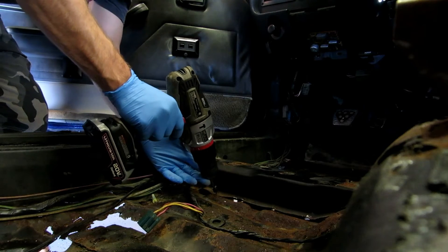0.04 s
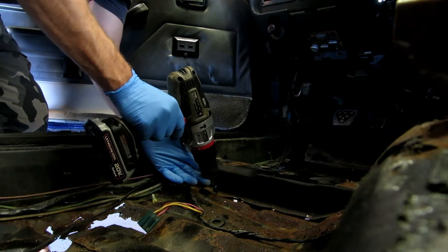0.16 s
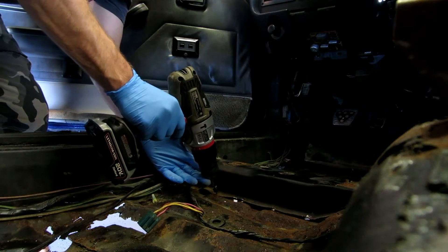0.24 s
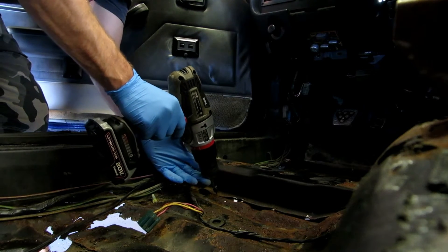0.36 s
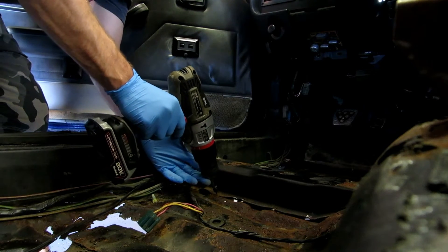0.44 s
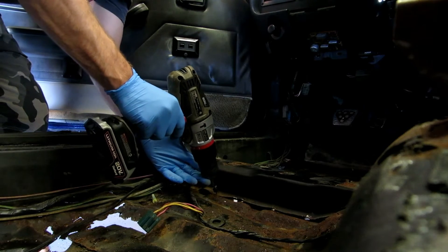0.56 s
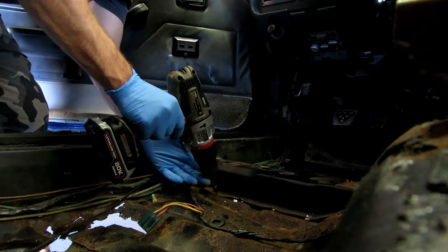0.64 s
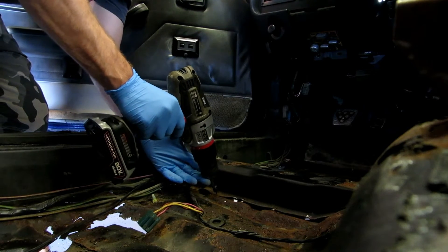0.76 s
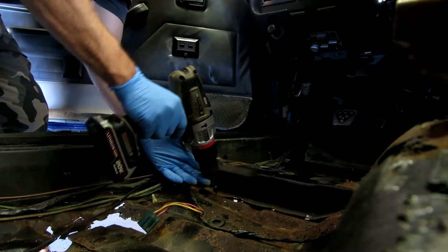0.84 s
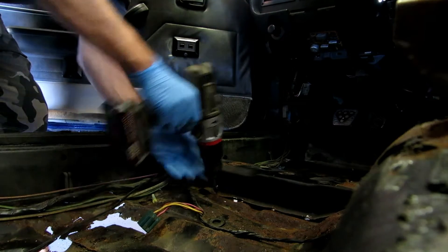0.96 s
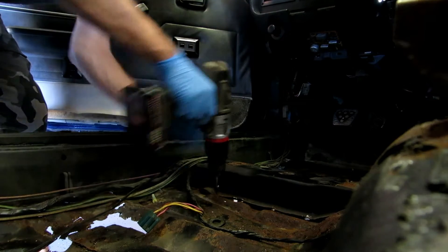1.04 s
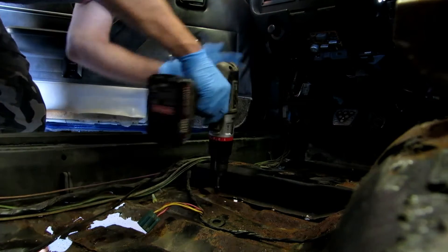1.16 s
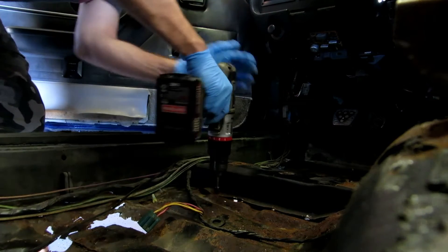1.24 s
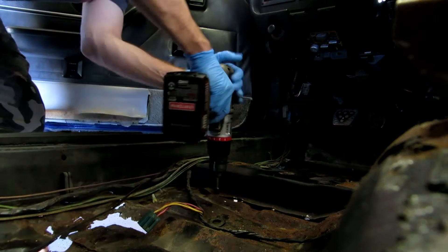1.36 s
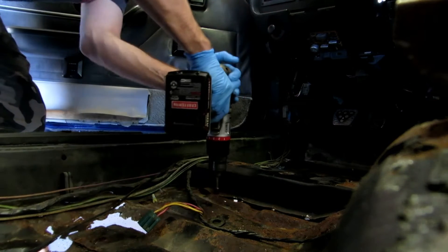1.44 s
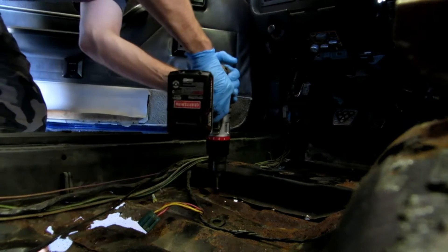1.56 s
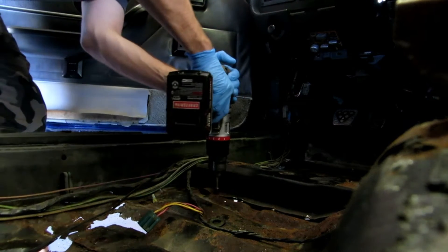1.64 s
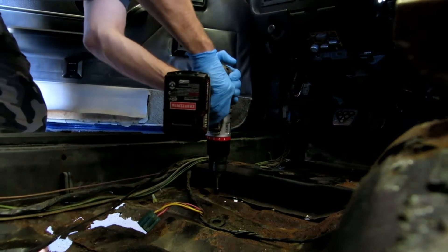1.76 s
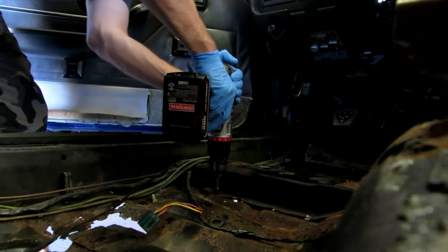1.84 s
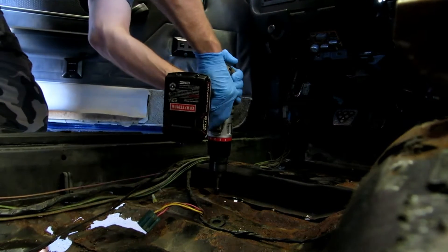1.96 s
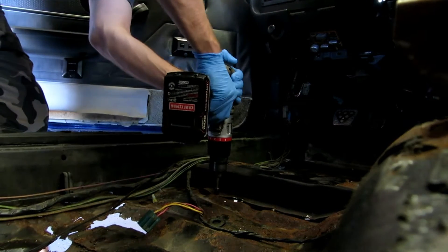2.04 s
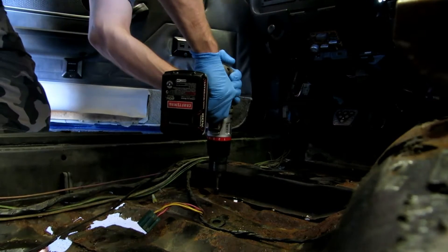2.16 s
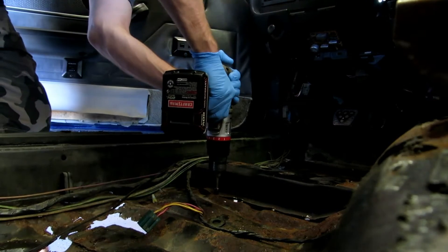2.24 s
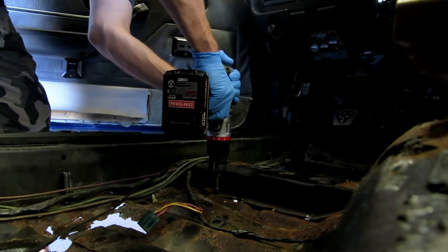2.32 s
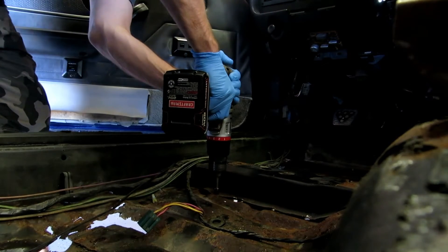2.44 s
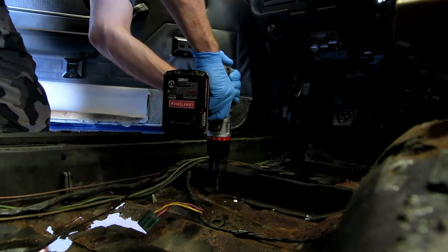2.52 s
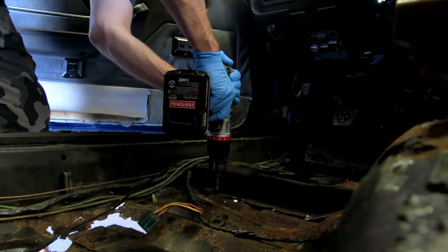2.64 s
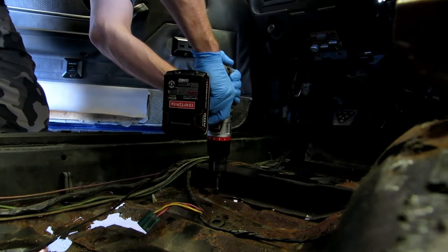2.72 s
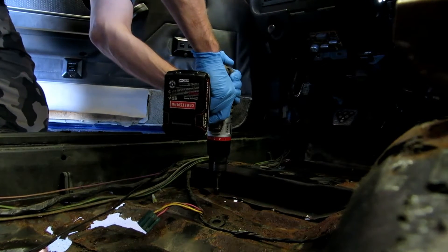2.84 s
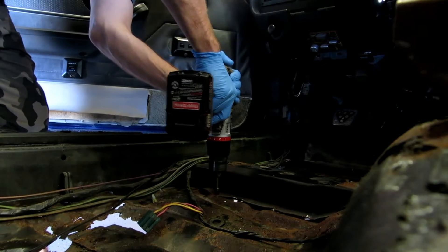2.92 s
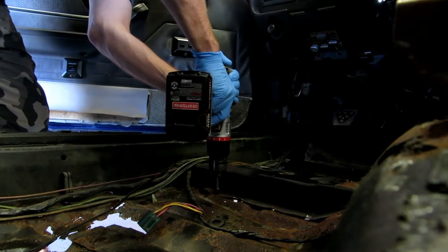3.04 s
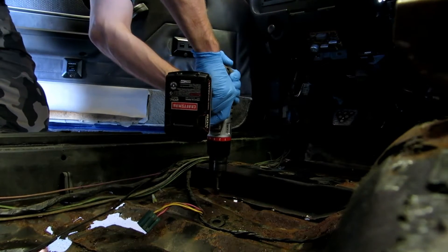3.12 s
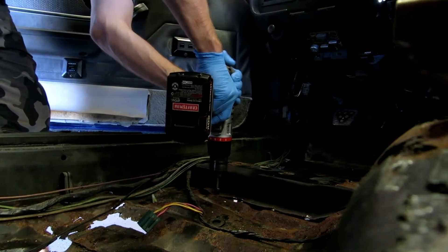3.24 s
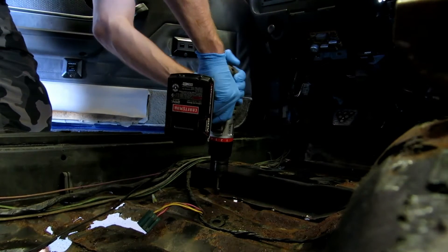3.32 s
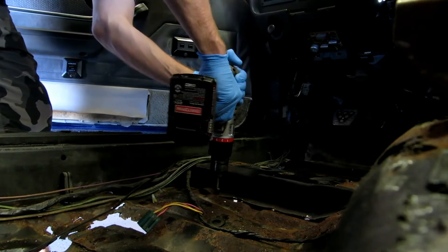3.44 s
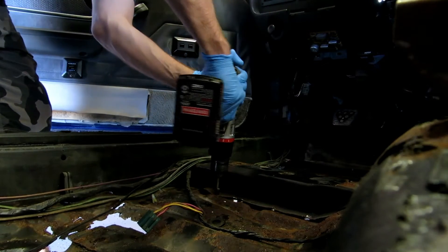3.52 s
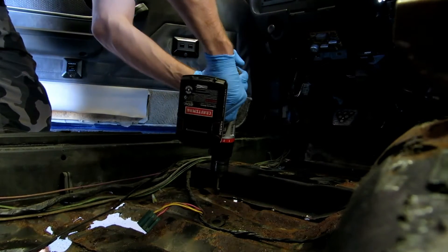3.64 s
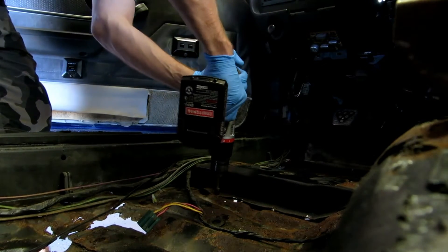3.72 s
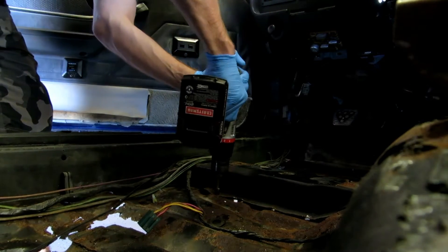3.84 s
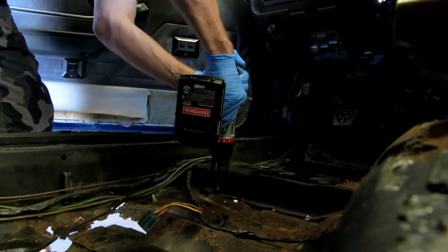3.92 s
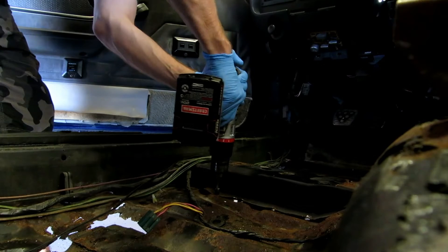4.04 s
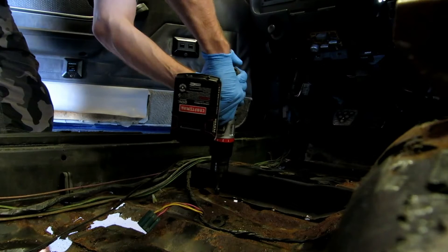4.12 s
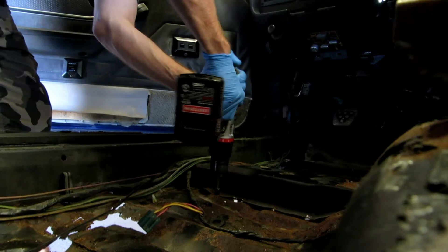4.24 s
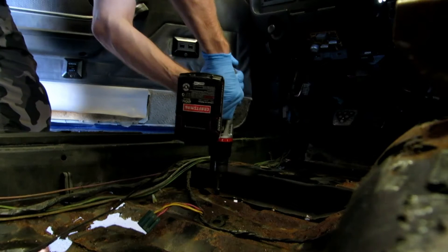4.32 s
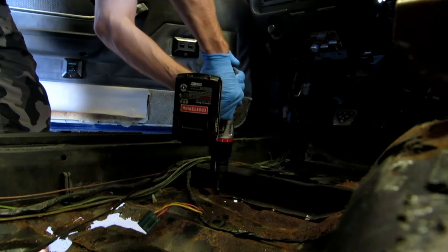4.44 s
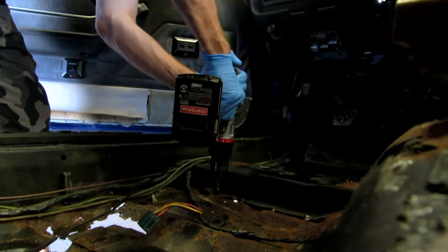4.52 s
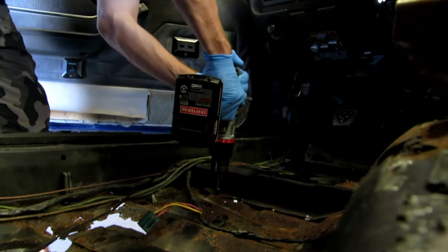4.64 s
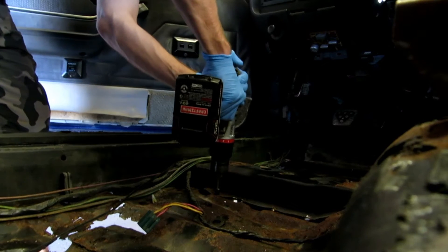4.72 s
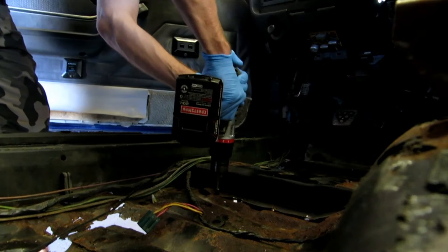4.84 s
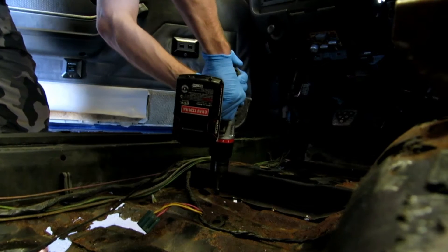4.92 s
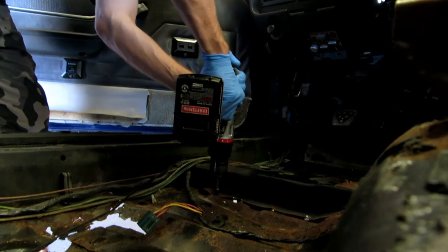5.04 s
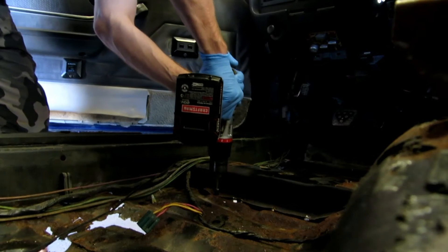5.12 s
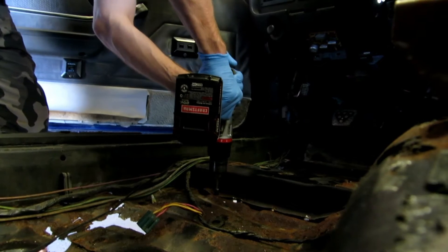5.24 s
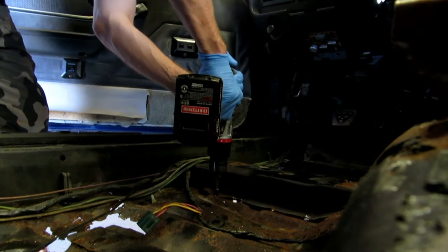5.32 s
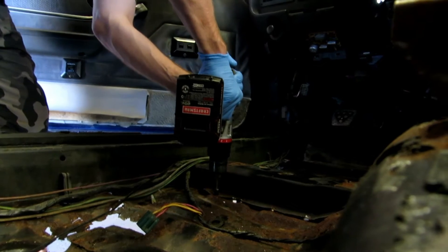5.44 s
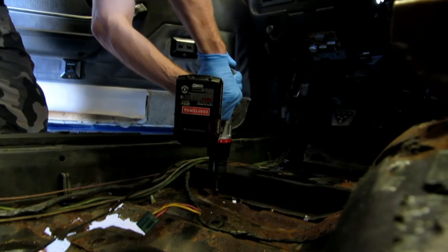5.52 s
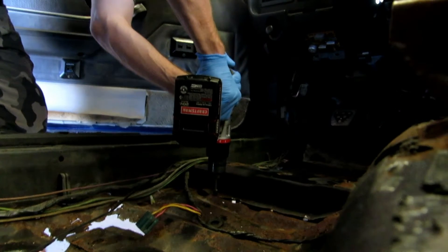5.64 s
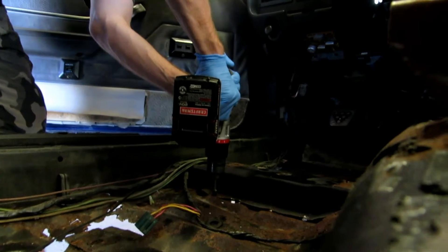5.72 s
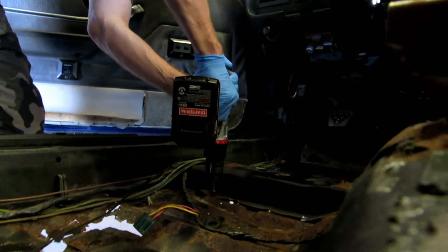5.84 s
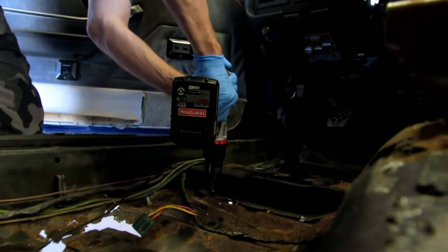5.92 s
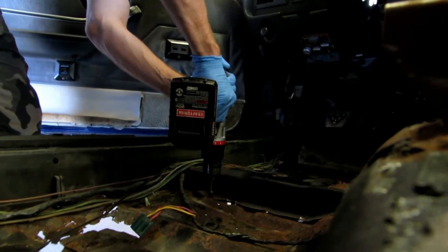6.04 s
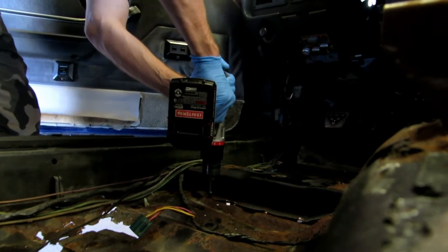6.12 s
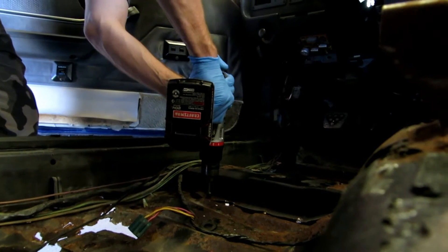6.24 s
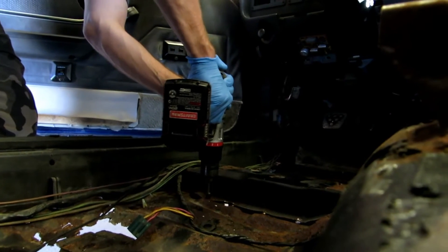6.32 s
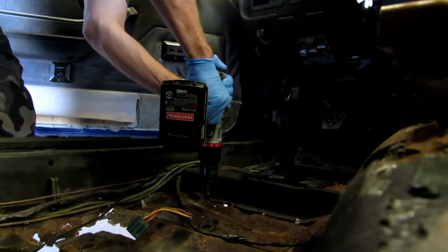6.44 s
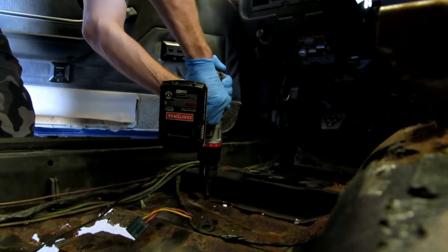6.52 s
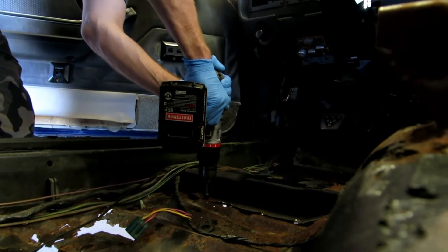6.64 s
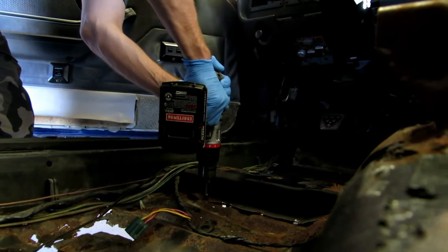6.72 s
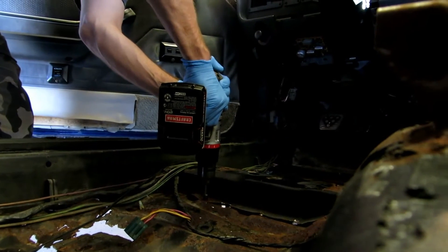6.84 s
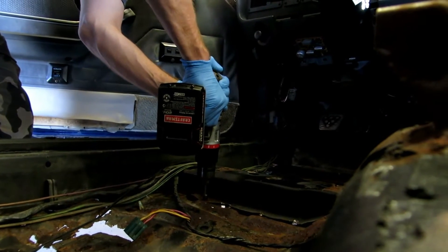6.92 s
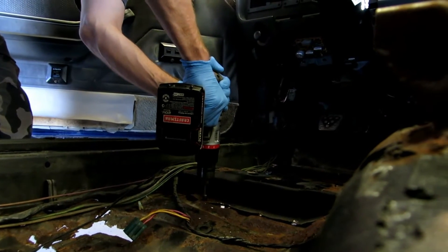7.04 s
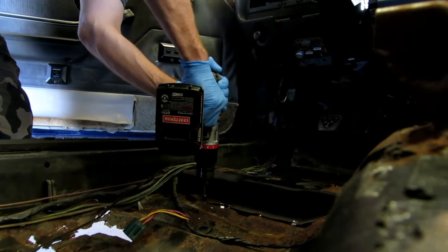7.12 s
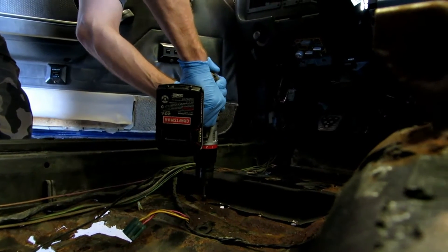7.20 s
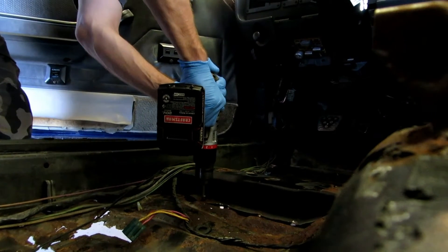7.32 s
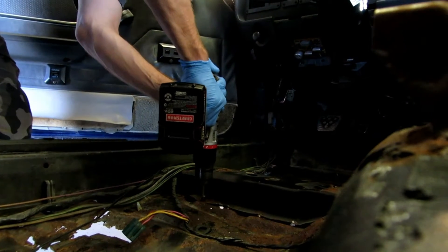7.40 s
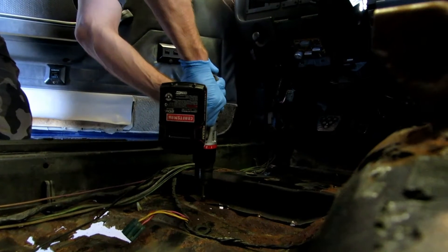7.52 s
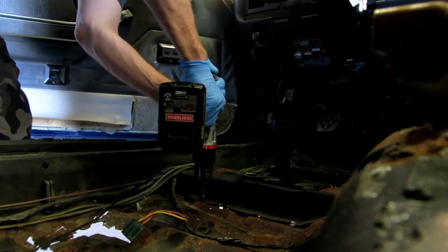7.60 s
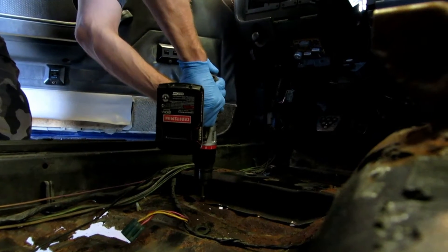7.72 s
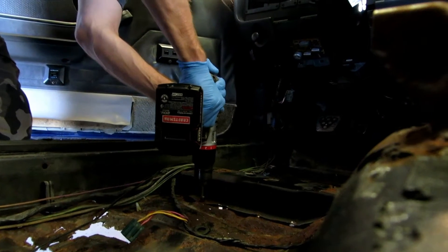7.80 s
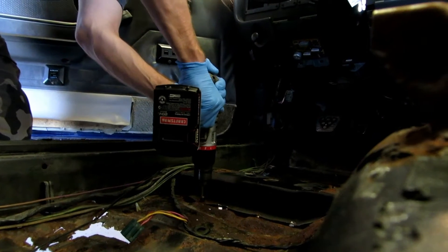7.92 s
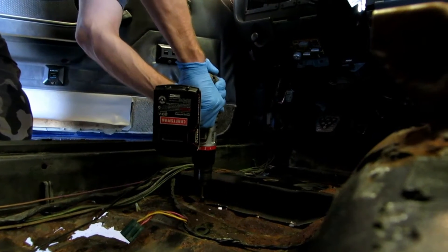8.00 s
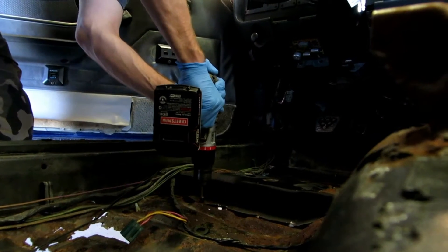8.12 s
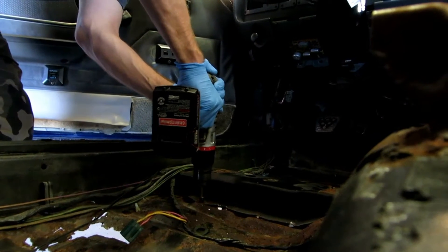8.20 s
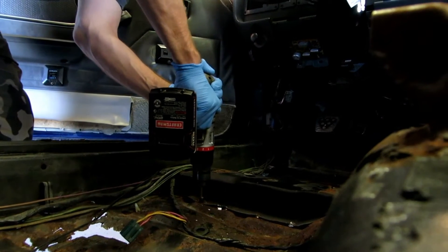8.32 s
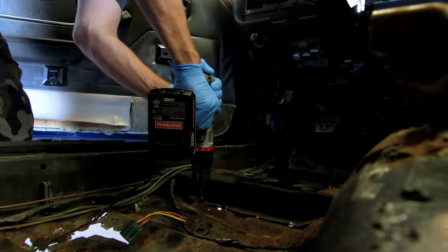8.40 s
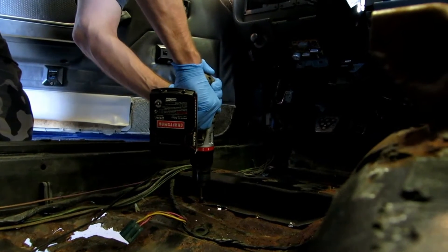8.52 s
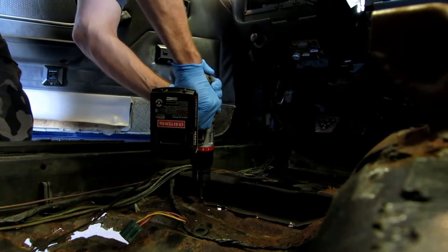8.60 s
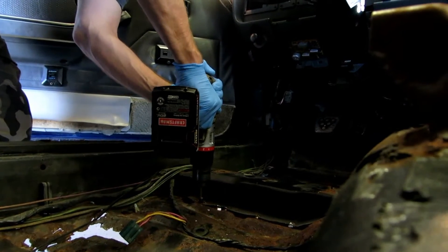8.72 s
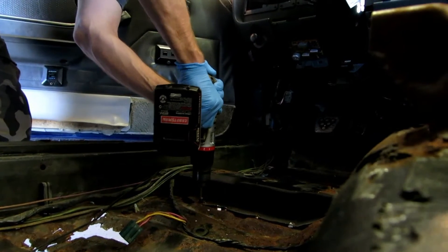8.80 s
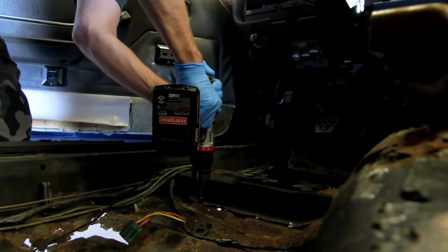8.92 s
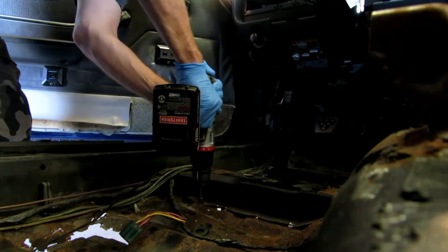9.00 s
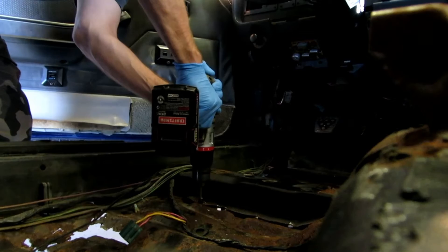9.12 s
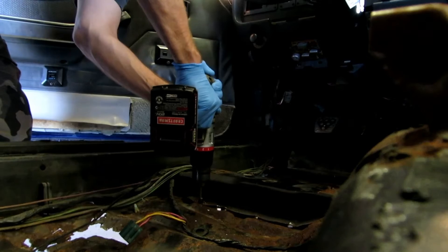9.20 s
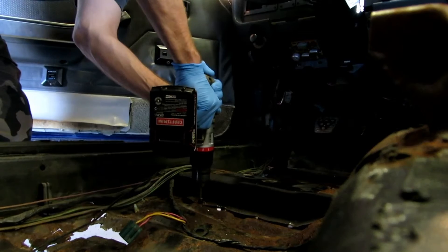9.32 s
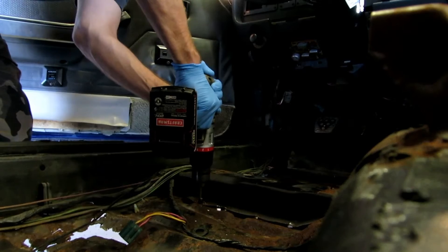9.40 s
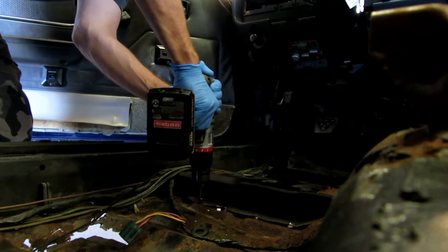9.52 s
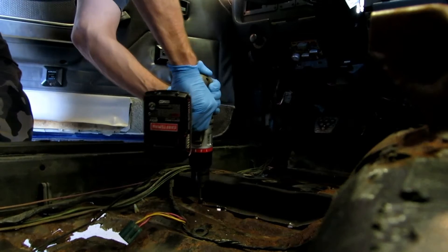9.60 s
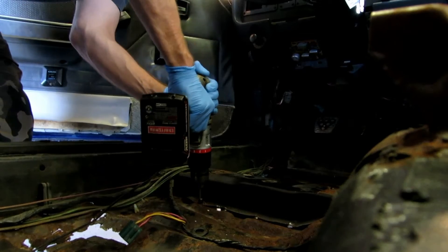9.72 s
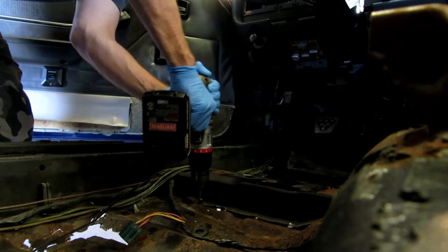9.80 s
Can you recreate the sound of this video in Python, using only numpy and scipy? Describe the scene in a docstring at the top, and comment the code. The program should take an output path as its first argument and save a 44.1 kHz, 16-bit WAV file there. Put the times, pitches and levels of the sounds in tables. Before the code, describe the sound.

Light knocks and faint rubbing come as a cordless drill is set against the bare steel floor of a stripped car. The cutter bites in two short bursts, each scraping to a stop. Then one long cut follows: bright grinding over ringing chatter and a low rumble, squeaking at first, then groaning, until it breaks through with a sharp snap. The microphone is close, inside the cabin, over faint background noise.

```python
"""Knocks and rubbing sound over a faint background as hands and a cordless drill meet a stripped car's floor.
The drill drives a toothed cutter into the rusty sheet steel: two short bursts, then one long cut that
squeaks at first, groans, and breaks through with a snap. Tooth impacts force the floor pan's modes into
vibration and tearing chips grind brightly; a nearby camera's gain control and limiter hold the level."""
import sys
import numpy as np
from scipy import signal
from scipy.fft import rfft, irfft, next_fast_len
from scipy.io import wavfile
from scipy.ndimage import uniform_filter1d

SR = 44100
rng = np.random.default_rng(int(sys.argv[2]) if len(sys.argv) > 2 else 0)


def persist_wave(psi):
    """Save psi, clipped to +-1, as 16-bit WAV."""
    counts = np.round(np.clip(psi, -1, 1) * 32767).astype(np.int16)
    wavfile.write(sys.argv[1], SR, np.atleast_2d(counts).T)


N = 434826
N_FFT = 2 ** 19
HZ, T = np.fft.rfftfreq(N_FFT, 1 / SR), np.arange(N) / SR

# rotation of the chuck: time_s, turns_per_s
CHUCK_SPEED = [(6.2, 16.55), (6.35, 18.0), (6.5, 16.55), (7.2, 16.25), (7.55, 15.55), (7.75, 16.06),
               (8.5, 16.06), (8.62, 15.55), (9.25, 16.2), (9.75, 15.3)]


def gain_of(db):
    """Decibels as an amplitude ratio."""
    return 10 ** (np.asarray(db) / 20)


def unit_rms(x):
    """Normalisation to unit power."""
    return x / np.sqrt(np.mean(x ** 2) + 1e-20)


def spectrum(points):
    """Interpolation of a table on a log frequency axis."""
    hz, value = np.transpose(points)
    return np.interp(np.log(HZ + 1), np.log(hz + 1), value)


def modal_response(modes):
    """Superposition of damped resonances of alternating sign."""
    return sum((-1) ** k * gain_of(db) / (1 + 2j * (HZ - hz) / width)
               for k, (hz, width, db) in enumerate(modes))


def filtered(x, response):
    """Linear filtering, scaled so that white noise keeps its power."""
    return irfft(rfft(x, N_FFT) * response / np.sqrt(np.mean(abs(response) ** 2)))[..., :N]


def shot_noise(per_s, spread_db):
    """Shot noise: independent clicks of uneven size."""
    size = gain_of(spread_db * np.minimum(rng.exponential(1, N), 5)) * rng.standard_normal(N)
    return unit_rms(size * (rng.random(N) < per_s / SR))


def smooth_noise(count, size):
    """Low-pass noise of rms 1, by two moving averages."""
    return unit_rms(uniform_filter1d(uniform_filter1d(rng.standard_normal(count), size), size))


def wander(seconds):
    """Slow random modulation of rms 1."""
    return np.repeat(smooth_noise(N // 16 + 1, max(round(seconds * SR / 16), 1)), 16)[:N]


def yard_air():
    """Partial coherence: background noise sounds wide, being partly opposed in the two channels."""
    # background spectrum: frequency_hz, relative_db
    colour = [(53, -27), (90, 1), (151, -9.5), (191, 0), (270, -9), (365, -2), (407, -10.5), (963, -4.5),
              (1510, -9.5), (7610, -23), (15500, -36)]
    # left-right likeness: frequency_hz, correlation
    coherence = [(60, -0.26), (240, -0.66), (950, -0.83), (3770, -0.74), (15000, -0.11)]
    left, independent = rfft(rng.standard_normal((2, N)), N_FFT)
    same = np.clip(spectrum(coherence), -1, 1)
    right = same * left + np.sqrt(1 - same ** 2) * independent
    noise = irfft(np.array([left, right]) * gain_of(spectrum(colour)))[:, :N]
    return gain_of(-40.5 + 1.5 * wander(0.036)) * unit_rms(noise)


def drone():
    """Narrow-band noise near 54 Hz booms at each thump; the channels differ in phase."""
    # slow envelope: time_s, level_db
    levels = [(0.0, -57), (1.7, -57), (2.5, -49), (4.1, -58), (4.37, -45), (6.5, -52), (7.2, -60),
              (9.0, -50), (9.86, -60)]
    low = unit_rms(filtered(rng.standard_normal(N), 1 / (1 + ((HZ - 54) / 13.6) ** 4)))
    quadrature = signal.hilbert(low, next_fast_len(N))[:N].imag
    pair = low + np.outer([1, -1], quadrature + 0.2 * low)
    boom = gain_of(-23.5) * uniform_filter1d(knock_envelope("thump", stretch=4.7), size=2000)
    return (gain_of(np.interp(T, *np.transpose(levels)) + 1.9 * wander(0.21)) + boom) * pair


def knock_envelope(layer, stretch):
    """Impact transients: a quick crack, then exponential decay of 60 dB in stretch * decay_s."""
    # blows of tool, trigger and hands: start_s, pan_db, thump_db, tick_db, decay_s
    knocks = [(0.085, -29, -49, -47, 0.17), (0.114, -24.5, -49, -53, 0.14), (0.176, -19, -37, -38, 0.13),
              (0.216, -13.5, -31, -53, 0.14), (0.517, -31, -50, -57, 0.19), (0.824, -31, -47, -36.5, 0.23),
              (0.942, -16.5, -31, -46, 0.097), (0.993, -38, -48, -34.5, 0.14), (1.078, -27, -42, -34, 0.18),
              (1.108, -30, -48, -39, 0.13), (1.22, -22, -43, -44, 0.25), (1.248, -24, -44, -40, 0.15),
              (1.333, -17.5, -39, -26.5, 0.36), (1.376, -0.5, -17, -27, 0.1), (1.758, -41, -63, -44, 0.33),
              (1.799, -33, -67, -43, 0.26), (1.962, -11.5, -36, -32.5, 0.089), (2.222, -26, -42, -54, 0.16),
              (2.301, -42, -60, -39, 0.1), (2.416, -36, -58, -48, 0.25), (2.463, -33, -49, -59, 0.25),
              (2.67, -23.5, -49, -48, 0.12), (2.815, -25, -45, -57, 0.086), (2.849, -5, -33, -24, 0.27),
              (2.891, 8.5, -17, -10, 0.25), (3.114, -12.5, -60, -40, 0.074), (3.296, -18, -39, -35, 0.1),
              (3.636, -21, -35, -31.5, 0.2), (3.686, -8.5, -20, -18.5, 0.082), (3.741, -7, -21, -20, 0.12),
              (4.054, -28, -53, -39, 0.087), (4.173, -31, -46, -52, 0.18), (4.216, -19, -31.5, -31.5, 0.21),
              (9.744, 1, -10, -9.5, 0.041)]
    column = ["pan", "thump", "tick"].index(layer)
    envelope = np.zeros(N)
    for start, *levels_db, decay in knocks:
        part = envelope[round(start * SR):][:SR // 2]
        t = T[:len(part)]
        attack = np.minimum(t / 0.00027, 1) * (1 + 0.38 * np.exp(-t / 0.001))
        part += attack * gain_of(levels_db[column] - 60 * t / (decay * stretch))
    return envelope


def knock_force(layer, stretch=1):
    """Broadband excitation: a burst of noise at each knock."""
    return knock_envelope(layer, stretch) * rng.standard_normal(N)


def thumps_and_ticks():
    """Impact noise: the low thump of a blow outlasts its bright tick."""
    # spectra of the two parts: frequency_hz, relative_db
    thump_colour = [(35, -35), (60, -15), (119, -5), (269, -6), (335, 2.5), (446, -7), (500, 3), (650, -14),
                    (1100, -120)]
    tick_colour = [(880, -45), (1500, -6), (5450, -11.5), (6430, -15.5), (7670, -19), (9230, -17.5),
                   (15500, -36)]
    thumps = filtered(knock_force("thump", stretch=1.56), gain_of(spectrum(thump_colour)))
    return thumps + filtered(knock_force("tick"), gain_of(spectrum(tick_colour)))


def rustle_and_scrapes():
    """Sliding friction: faint handling rustle; the cutter scrapes, coasting after each short burst."""
    # one handling scuff, then the coasting cutter: peak_s, relative_db, rise_db_per_s, fall_db_per_s
    scrapes = [(1.29, -36, 60, 59), (2.99, -45.5, 83, 18), (3.121, -21, 443, 700),
               (3.86, -10.5, 400, 171.5)]
    # friction spectrum: frequency_hz, relative_db
    colour = [(59, -52), (100, -6), (355, -4), (1020, -0.5), (1620, -8), (2930, -9.5), (6260, -21),
              (15500, -39)]
    envelope = gain_of(-45.5) * (T < 3.9)  # the rustle ends before the long cut
    for peak, db, rise, fall in scrapes:
        envelope += gain_of(db - np.maximum(rise * (peak - T), fall * (T - peak)))
    friction = envelope * gain_of(-4.5 + 0.66 * wander(0.021)) * shot_noise(4000, 0.99)
    return filtered(friction, gain_of(spectrum(colour)))


def clink():
    """Free vibration: a loose steel part rings in quickly damped modes."""
    # the part's ring: start_s, then rows of pitch_hz, peak_db, t60_s
    loose_part = (.995, [(2250, -37, .07), (4300, -42, .06), (5500, -29, .09)])
    start, modes = loose_part
    t, out = T[:SR // 5], np.zeros(N)
    for hz, db, t60 in modes:
        out[round(start * SR):][:len(t)] += gain_of(db - 60 * t / t60) * np.sin(2 * np.pi * hz * t)
    return out


def chuck_turns():
    """Angle as the integral of speed, in turns: whole where the cutter's high spot meets the weld."""
    turns = np.cumsum(np.interp(T, *np.transpose(CHUCK_SPEED))) / SR
    contact_s = 5.897
    return turns - turns[round(contact_s * SR)]


def force_swell():
    """Amplitude modulation, in dB of chatter: the force swells once a turn and at each grab."""
    # the high spot digging in: time_s, swell_db
    runout = [(5.0, -1), (5.35, 3), (5.7, 2.5), (5.85, 1.5), (6.0, 4.5), (6.35, 1.5), (6.6, 3), (6.68, 6)]
    # single hard grabs of the cutter: time_s, swell_db
    grabs = [(4.3, 2.5), (4.666, 1), (4.75, 5), (5.178, 3), (5.415, 3.5), (5.494, 2), (5.587, 6),
             (5.715, 3), (5.875, 5), (6.485, -0.5), (6.55, 3), (7.0, 4), (7.103, 5.5), (7.504, 5.5),
             (7.65, 1.5), (7.76, 3), (8.34, 5.5), (8.83, 6), (8.99, 3.5), (9.06, 5), (9.19, 4.5)]
    turns, width_s = chuck_turns(), 0.016
    from_contact_s = (turns - np.round(turns)) / CHUCK_SPEED[0][1]
    swell = np.interp(T, *np.transpose(runout), 0, 0) * np.exp(-(from_contact_s / width_s) ** 2)
    return swell + sum(db * np.exp(-((T - peak) / width_s) ** 2) for peak, db in grabs)


def cut_gain(layer):
    """Envelope of the driving force: spin-up, a kick as the teeth bite, the load, then coasting down."""
    # trigger pulls: start_s, release_s, force_db
    pulls = [(2.862, 2.965, -1), (3.703, 3.853, 0.5), (4.223, 9.9, -1)]
    # response to a pull, a row per layer: rise_db, kick_db, fall_db_per_s
    responses = [(26.5, 0.5, 222.5), (30, 5, 272.5), (22, 3.5, 170)]
    # load on the cutter: time_s, chatter_db, grinding_db, rumble_db
    load = [(4.4, -10, -19, -21), (4.62, -13.5, -19, -19.5), (4.7, -14, -22.5, -32),
            (4.9, -16.5, -24.5, -26), (5.2, -15, -18.5, -29.5), (5.5, -15, -19, -21),
            (5.93, -14.5, -17, -21.5), (6.2, -12, -18.5, -32.5), (6.6, -15, -18.5, -30),
            (6.67, -21, -18, -30.5), (7.425, -22, -16, -29), (7.455, -14, -16, -25), (7.76, -17, -18, -29),
            (7.93, -24, -17.5, -31.5), (8.3, -19.5, -16, -29), (8.52, -22, -14.5, -31),
            (8.85, -17.5, -15, -25.5), (9.73, -22, -14, -35), (9.752, -18, -17, -22),
            (9.775, -25, -24, -37)]
    index = ["chatter", "grinding", "rumble"].index(layer)
    rise_db, kick_db, fall_db_per_s = responses[index]
    spin_up_s, kick_s = 0.045, 0.035
    gain = np.zeros(N)
    for start, release, db in pulls:
        on = slice(round(start * SR), N)
        since_bite = T[on] - start - spin_up_s
        onset_db = rise_db * np.minimum(since_bite / spin_up_s, 0)
        onset_db += kick_db * np.exp(-abs(since_bite) / kick_s)
        gain[on] += gain_of(db + onset_db - fall_db_per_s * np.maximum(T[on] - release, 0))
    times, *load_db = np.transpose(load)
    return gain * gain_of(np.interp(T, times, load_db[index]))


def rumble(swell):
    """Forced vibration: the body shell shakes and hums at the tooth-passing frequency."""
    # shell spectrum: frequency_hz, relative_db
    colour = [(35, -50), (60, -20), (76, -19), (118, -5), (188, -0.5), (330, 2), (450, -3.5), (500, 3),
              (650, -4), (1100, -120)]
    # tooth hum: time_s, level_db
    hum_levels = [(6.4, -60), (6.58, -37), (6.72, -59), (7.15, -39.5), (7.6, -44), (7.8, -34), (8.37, -34),
                  (8.52, -46.5), (9.1, -35), (9.25, -47), (9.56, -39), (9.75, -46)]
    teeth = 8
    force = cut_gain("rumble") * gain_of(-1.64 + 0.99 * swell + 2.6 * wander(0.05))
    force *= rng.standard_normal(N)
    hum = np.sqrt(2) * np.sin(2 * np.pi * teeth * chuck_turns() + 0.24 * wander(0.041))
    hum *= gain_of(np.interp(T, *np.transpose(hum_levels), -200, -200) + 1.2 * wander(0.08))
    return filtered(force, gain_of(spectrum(colour))) + hum


def groans(swell):
    """Self-excited oscillation: the cut locks onto modes of the pan in trembling tones."""
    # locked tones: start_s, end_s, pitch_hz, relative_db
    tones = [(5.3, 5.68, 589, -24), (5.8, 6.63, 583, -20.5), (5.3, 5.65, 675, -23.5),
             (6.33, 6.63, 675, -27), (5.2, 5.45, 817, -25), (5.5, 5.62, 797, -22), (5.9, 6.45, 803, -22.5),
             (6.7, 9.74, 830, -30.5), (7.46, 7.62, 837, -25), (5.3, 6.0, 181, -33), (7.4, 8.55, 327, -35),
             (9.2, 9.62, 321, -34)]
    fade_s, tremble_hz = 0.09, 4.02
    out = np.zeros(N)
    for start, end, hz, db in tones:
        corners = [start - fade_s, start, end, end + fade_s / 2]
        on = (T >= corners[0]) & (T <= corners[-1])
        phase = 2 * np.pi * np.cumsum(hz + tremble_hz * wander(0.011)[on]) / SR
        level_db = db + np.interp(T[on], corners, [-20, 0, 0, -20]) + 0.5 + 2.4 * wander(0.051)[on]
        out[on] += np.sqrt(2) * np.sin(phase) * gain_of(level_db)
    return gain_of(1.25 * swell) * out


def squeaks():
    """Stick-slip friction: skidding teeth give rough tones that sag in pitch as they die."""
    # skids: start_s, relative_db, pitch_hz, overtone_db, decay_s
    skids = [(4.614, -7, 3060, -25, 0.14), (4.666, -1, 3950, -13, 0.1), (4.674, -7.5, 3460, -25, 0.16),
             (4.737, -5, 3170, -15, 0.11), (4.797, -11.5, 3100, -9.5, 0.21),
             (4.848, -1.5, 4000, -10.5, 0.11), (4.917, -13.5, 3150, -12, 0.19),
             (6.23, -10.5, 3430, -30, 0.11), (6.47, -12, 3400, -30, 0.1), (7.15, -13, 6400, -30, .1),
             (7.393, -9, 8640, -40, .06), (9.744, -5, 8600, -42.5, 0.045)]
    t, out = T[:SR // 5], np.zeros(N)
    for start, db, hz, overtone_db, decay in skids:
        jitter = 0.21 * np.cumsum(uniform_filter1d(rng.standard_normal(len(t)), size=30))
        phase = 2 * np.pi * hz * t * (1 - 0.424 * t) + jitter
        overtones = sum(gain_of(overtone_db - 10 * (k - 2)) * np.sin(k * phase)
                        for k in (2, 3, 4) if k * hz < SR / 2)
        envelope = gain_of(db + 3 - 75 * t / decay) * np.minimum(t / 0.0014, 1)
        part = out[round(start * SR):][:len(t)]
        part += (envelope * (np.sin(phase) + overtones))[:len(part)]
    return out


def snap():
    """Fracture transient: the cutter breaks through with a bright crack over a thud."""
    start_s, crack_db, length_s = 9.744, -11.5, 0.012
    envelope = (T > start_s) * np.clip(1 - (T - start_s) / length_s, 0, 1)
    thud = signal.lfilter(*signal.butter(1, [150, 1100], "band", fs=SR), rng.standard_normal(N))
    crack = np.diff(rng.standard_normal(N + 1))
    return gain_of(crack_db) * envelope * (unit_rms(crack) + 1.8 * unit_rms(thud))


def floor_pan(swell):
    """Modal resonance: coarse tooth impacts and knocks set the floor pan ringing."""
    # modes of the pan: pitch_hz, bandwidth_hz, relative_db
    modes = [(181, 10, -16.5), (195.7, 16, -10), (264.4, 16.6, -10), (342, 11, -13), (387, 21, -9),
             (532.5, 60, -6.5), (588, 25.3, 0.5), (670.8, 25.5, 1.5), (759, 48.5, 0.5), (815, 47.7, 5.5),
             (844, 53.4, 6), (909, 113, -3.5), (970.6, 36, 1.5), (1134, 54, -3.5), (1368, 69, -4.5),
             (1515, 25, -4), (1618, 66, -7.5), (1765, 240, -11.5), (1980, 174, -11), (2248, 92, -10),
             (2415, 160, -17)]
    chatter = cut_gain("chatter") * gain_of(swell + 2 + 0.36 * wander(0.065)) * shot_noise(3000, 1.9)
    blows = gain_of(1) * signal.lfilter([1, -0.8], 1, knock_force("pan"))  # the blows strike with a brighter tone than the chatter
    return gain_of(0.7) * filtered(chatter + blows, modal_response(modes))


def grinding(swell):
    """Random excitation: fine chips tear, and steel modes ring in turn as the contact shifts."""
    # chip spectrum: frequency_hz, relative_db
    chip_colour = [(88, -42), (150, -39), (326, -6.5), (453, -14.5), (530, -13), (827, -11), (1270, -6),
                   (1400, -7.5), (4140, -6), (8330, -15.5), (15500, -26.5)]
    # modes of cutter and sheet near the hole: pitch_hz, bandwidth_hz, relative_db
    modes = [(840, 60, 2), (1370, 50, -4), (1800, 60, -5), (2270, 50, 0), (2485, 50, -1), (2590, 45, -4),
             (2850, 55, -3), (3390, 70, 1), (3600, 50, -7), (4060, 50, -1), (4240, 50, 5), (4540, 60, -4),
             (4775, 55, 1), (5085, 90, -2), (5950, 60, -4), (6400, 160, -1), (7400, 60, -5), (8200, 60, -9)]
    once_a_turn = np.cos(2 * np.pi * chuck_turns())
    force_db = 2 + 0.13 * once_a_turn + 0.18 * swell + 0.67 * wander(0.017)
    force = cut_gain("grinding") * gain_of(force_db) * shot_noise(25000, 0.66)
    colour = gain_of(spectrum(chip_colour) + smooth_noise(len(HZ), 300))  # countless faint modes
    group_powers = [sum(abs(modal_response([mode])) ** 2 for mode in modes[k::3]) for k in range(3)]
    rings = np.array([filtered(force, colour * np.sqrt(power)) for power in group_powers])
    shares = gain_of([3.9 * wander(0.046) for _ in rings])
    ringing = (rings * shares).sum(0) / np.linalg.norm(shares, axis=0)
    return filtered(force, colour) + gain_of(-6) * ringing


def cabin(x):
    """Reverberation: the channels share the direct sound and get the reflections with opposite signs."""
    # strength of the reflections: frequency_hz, side_over_mid_db
    width = [(60, 7), (150, -4), (380, -16), (950, -11.5), (2380, -12.5), (5980, -9.5), (15000, -2.5)]
    # channel balance: frequency_hz, left_over_right_db
    lean = [(60, 12), (150, -1.5), (380, -4), (950, -1.5), (2380, -0.5), (5980, -0.5), (15000, -0.5)]
    t, t60_s = T[:SR // 2], 0.24
    taps = rng.standard_normal(len(t)) * gain_of(-60 * t / t60_s)
    echo = rfft(taps / np.linalg.norm(taps), N_FFT) * gain_of(spectrum(width))
    balance = gain_of(np.outer([0.5, -0.5], spectrum(lean)))
    return irfft(rfft(x, N_FFT) * balance * np.array([1 + echo, 1 - echo]))[:, :N]


def gain_control(dry):
    """Compression: the gain falls fast on loud sound and recovers slowly."""
    threshold_db, slope = -21.5, 0.29
    power_db = 10 * np.log10(abs(uniform_filter1d((dry ** 2).mean(0), size=3000)) + 1e-12)
    release_db = 11.6 * T
    held_db = np.maximum.accumulate(power_db + release_db) - release_db
    excess_db = np.maximum(held_db - threshold_db, 0)
    return dry / gain_of(slope * uniform_filter1d(excess_db, size=1000))


def scene():
    """Superposition: cutting and handling sound in the cabin, over the background."""
    swell = force_swell()
    cutting = floor_pan(swell) + groans(swell) + grinding(swell) + rumble(swell) + squeaks()
    contacts = thumps_and_ticks() + rustle_and_scrapes() + clink()
    return cabin(cutting + contacts + snap()) + yard_air() + drone()


def record(dry):
    """Gain control, soft saturation that rounds the highest peaks, then a low-pass band limit."""
    held = gain_control(dry)
    limited = held / (1 + abs(held) ** 6) ** (1 / 6)
    low_pass = signal.firwin(1023, cutoff=15690, window=("kaiser", 9), fs=SR)
    return signal.oaconvolve(limited, low_pass[None], "same")


dry = scene()
out = record(dry)
persist_wave(out)
```